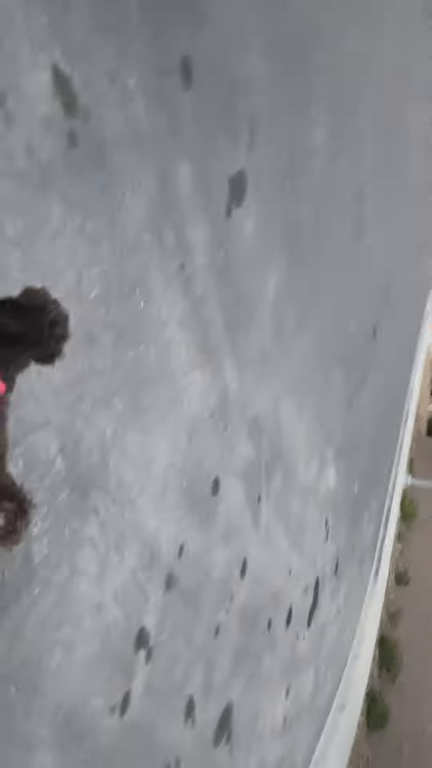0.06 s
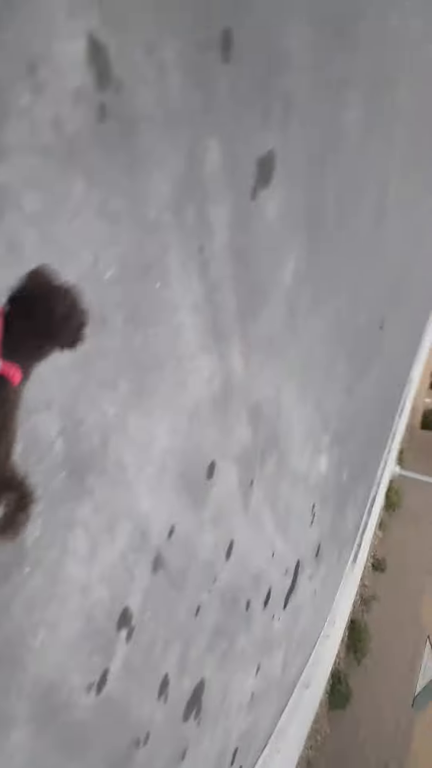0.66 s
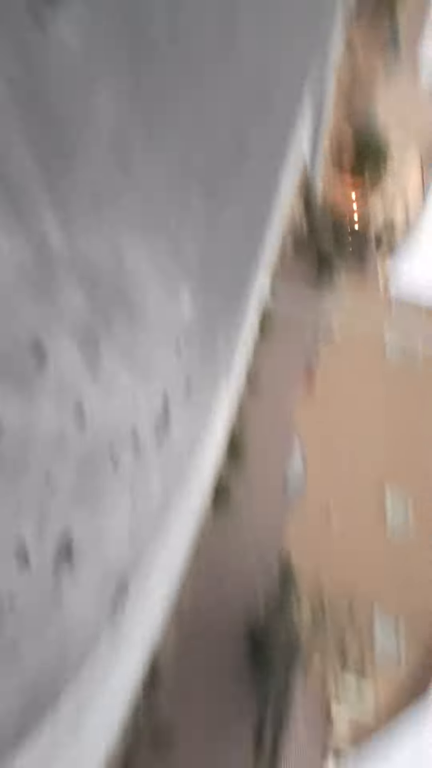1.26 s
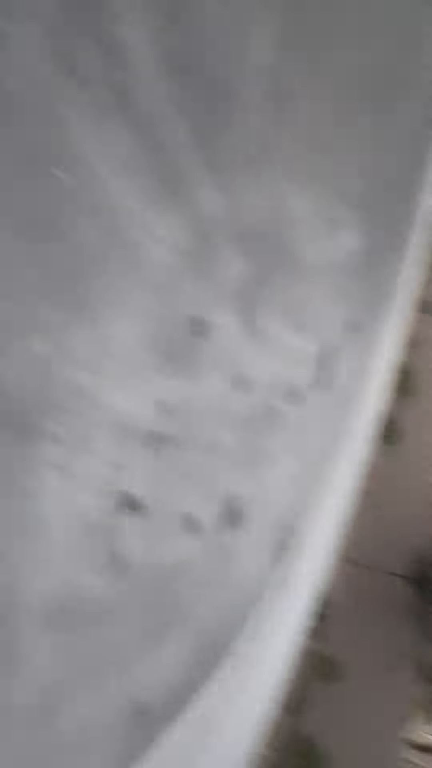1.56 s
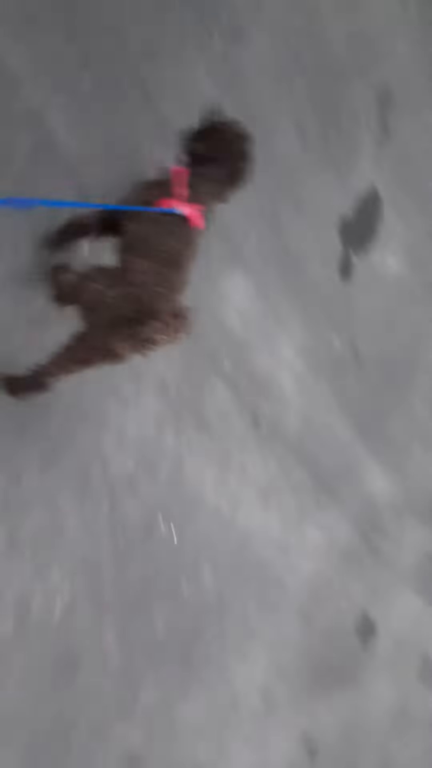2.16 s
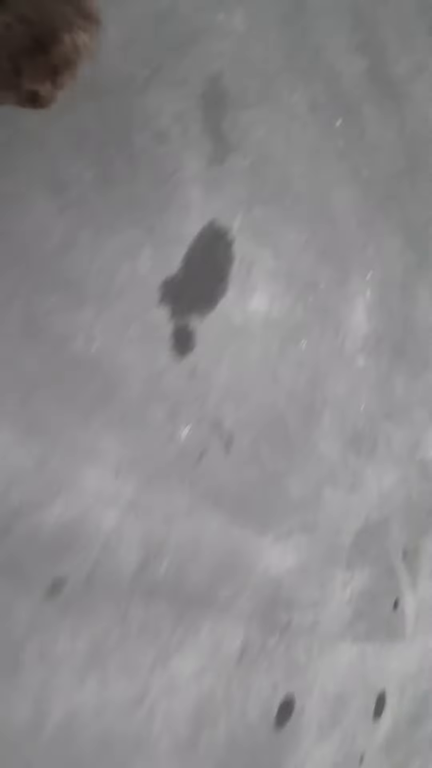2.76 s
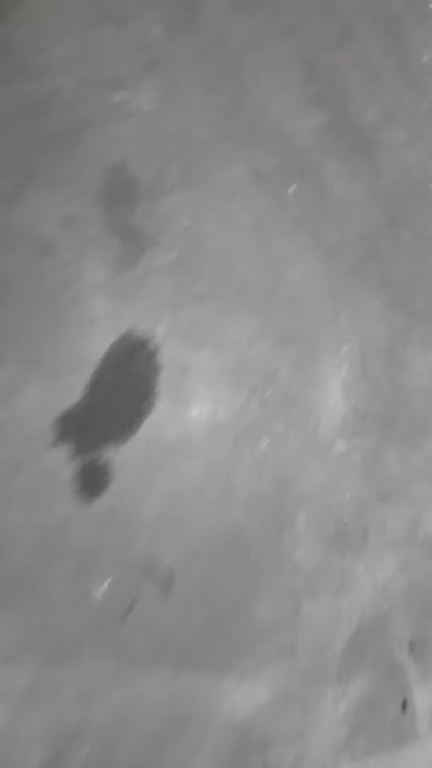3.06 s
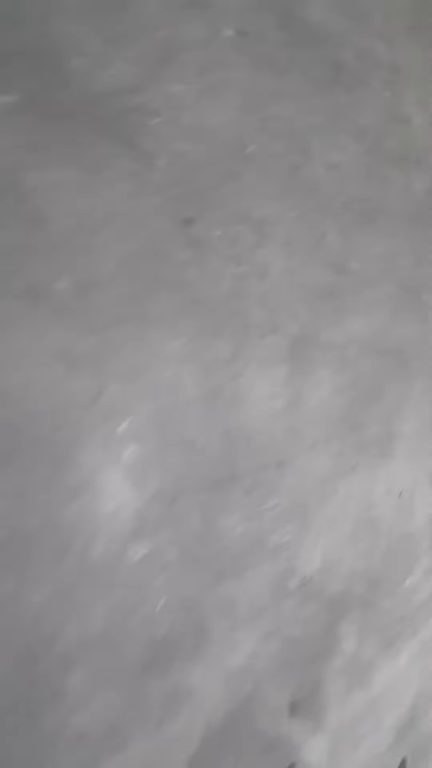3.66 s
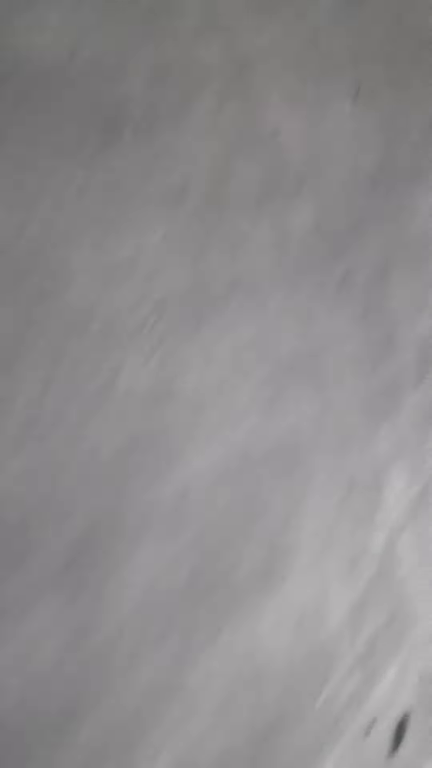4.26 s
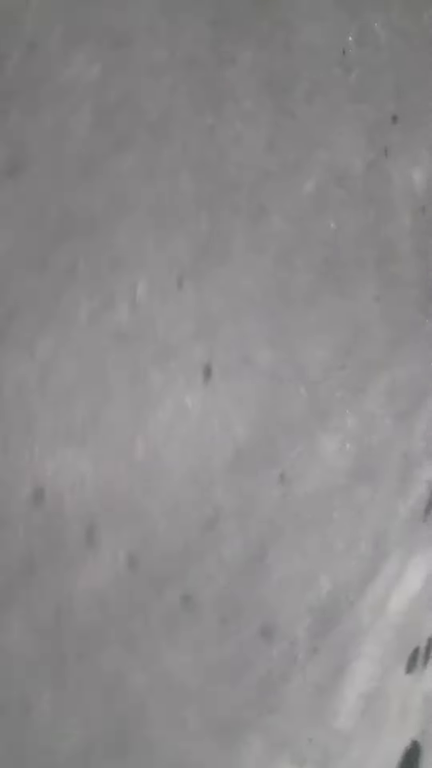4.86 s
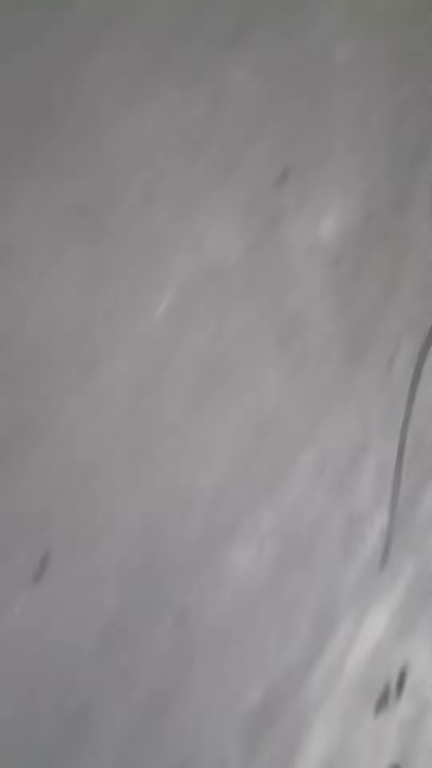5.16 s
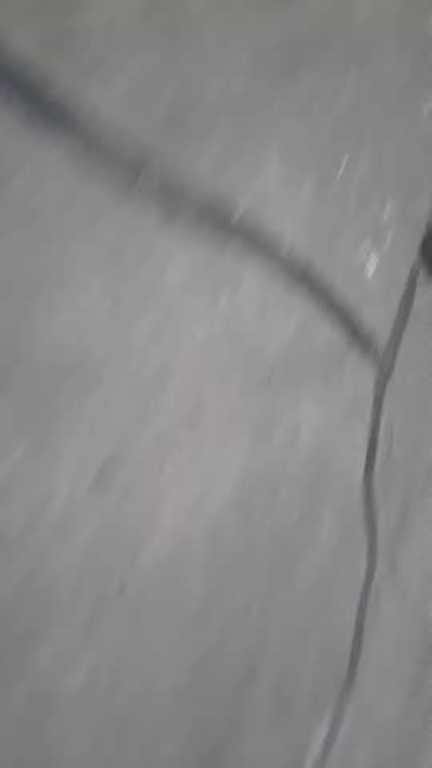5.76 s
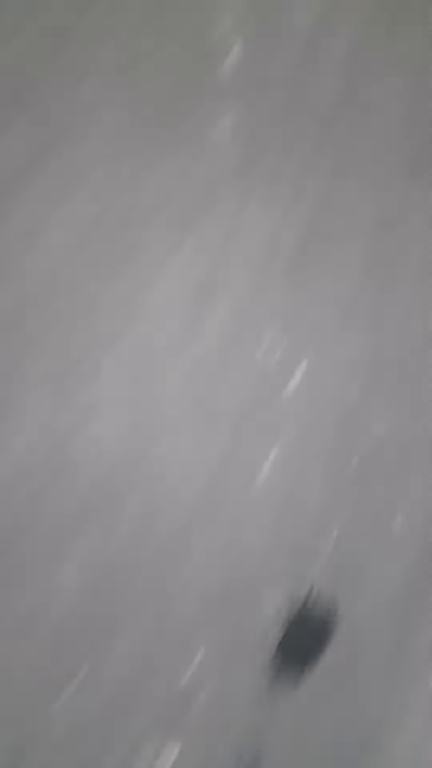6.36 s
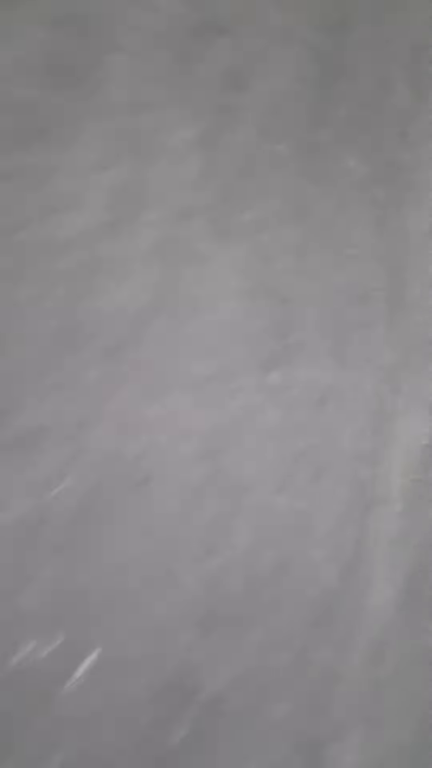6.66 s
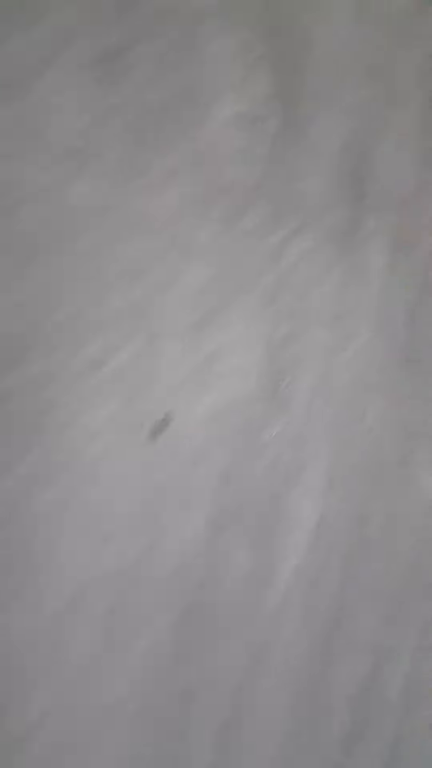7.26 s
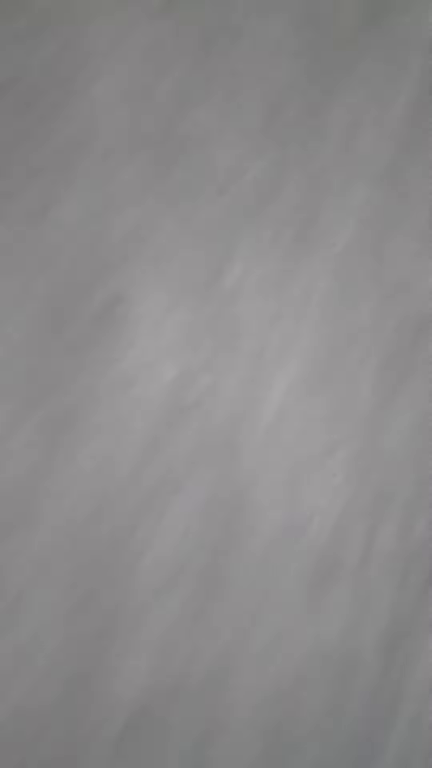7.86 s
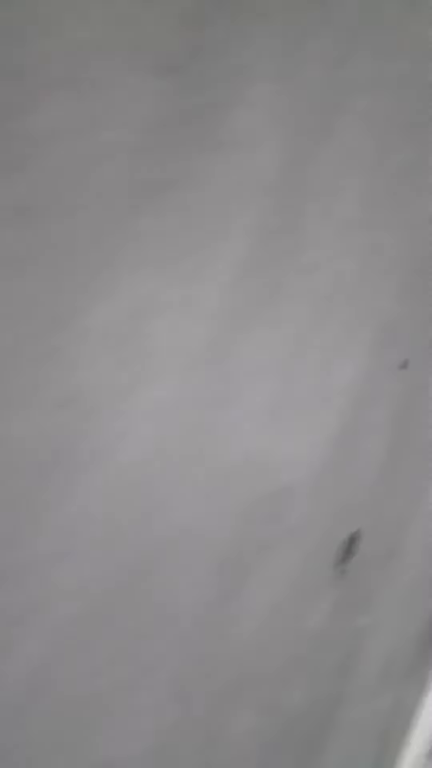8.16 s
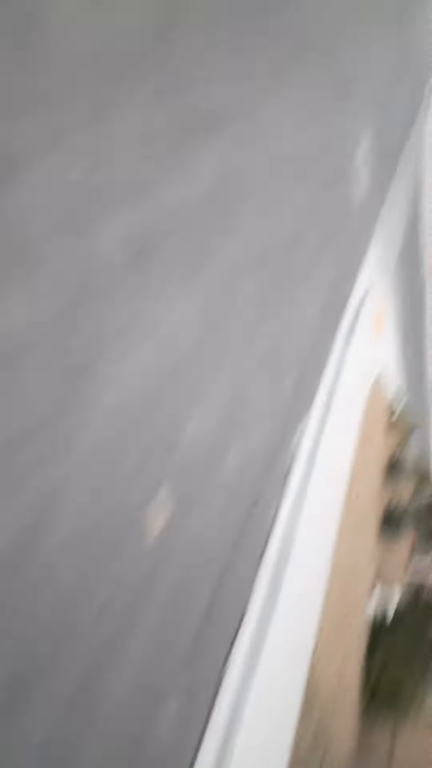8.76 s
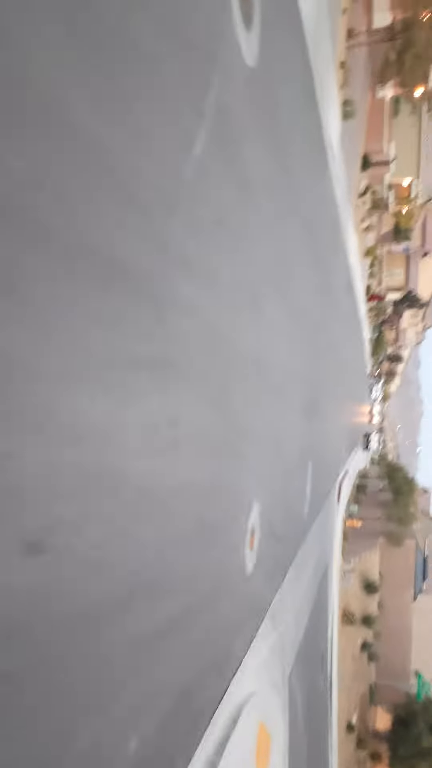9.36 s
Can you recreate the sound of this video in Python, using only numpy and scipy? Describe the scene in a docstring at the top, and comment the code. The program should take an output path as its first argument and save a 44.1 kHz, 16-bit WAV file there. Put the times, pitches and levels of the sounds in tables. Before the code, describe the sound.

Skateboard wheels rumble faster along a street while shoes scrape and knock on the wooden deck and wind buffets the microphone.

```python
"""An asphalt street: a skateboard is pushed off and gathers speed, a camera in the rider's hand.
The road's grain drums through the wheels, the bearings whirr and feet knock on the wooden deck.
Soles stick and slip on grit, something small ticks on the left, and there is a thin hiss with a
few faint squeaks. Headwind buffets the two microphone ports; the town hums far off."""
import sys
import numpy as np
from scipy import signal
from scipy.fft import rfft, irfft, next_fast_len
from scipy.io import wavfile
from scipy.ndimage import uniform_filter1d, map_coordinates

SR = 44100
rng = np.random.default_rng(int(sys.argv[2]) if len(sys.argv) > 2 else 0)


def store_pcm(level_fs):
    """Save levels as 16-bit WAV."""
    pcm = np.round(np.clip(level_fs, -1, 1) * 32767).astype(np.int16)
    wavfile.write(sys.argv[1], SR, np.atleast_2d(pcm).T)


N = 423360

# Strokes of a sole. Each row: start, crest and end in seconds, crest level in dB, slips per second
# at the crest, bite (0 dry scrape, 1 hollow rattle, 2 full rasp).
STROKES = [(1.085, 1.201, 1.22, -36, 101.7, 0.52), (1.415, 1.431, 1.464, -26, 367, .1),
           (1.46, 1.476, 1.497, -25, 370, 0.2), (1.496, 1.54, 1.57, -31, 220, 0.58),
           (1.559, 1.584, 1.68, -32.5, 496, 0), (1.741, 1.773, 1.85, -31, 293, 1.5),
           (2.087, 2.274, 2.36, -40, 58.8, 0.18), (2.38, 2.433, 2.495, -31, 92.3, 0.34),
           (2.669, 2.731, 2.87, -31, 160.5, 0.19), (2.941, 2.96, 2.985, -35, 219, 0.5),
           (3.177, 3.232, 3.275, -27, 228, 1.74), (3.261, 3.327, 3.41, -24.5, 229, 2),
           (3.374, 3.39, 3.48, -29.5, 97, 1.7), (3.486, 3.606, 3.79, -41.5, 58.9, 1.7),
           (4.31, 4.334, 4.385, -37, 120.5, 1.05), (4.381, 4.43, 4.46, -40, 160, 1.3),
           (4.565, 4.59, 4.61, -40, 140, .95), (4.908, 4.963, 5.075, -31.5, 149.7, 1.2),
           (5.404, 5.491, 5.535, -32, 143, 0.7), (5.707, 5.735, 5.8, -31, 259, 0.67),
           (5.852, 5.912, 5.95, -33.5, 91.9, 0.5), (5.978, 6.032, 6.22, -46, 85.4, 0.6),
           (6.241, 6.401, 6.55, -40.5, 117.9, 0.26), (6.585, 6.63, 6.68, -37, 89.3, .95),
           (7.132, 7.209, 7.28, -31.5, 228.6, 1.26), (7.318, 7.362, 7.44, -33, 149, 0.92),
           (8.014, 8.048, 8.21, -38, 89.2, 1.6), (8.45, 9.151, 9.44, -51.5, 300, 1.7),
           (9.44, 9.543, 9.6, -42.5, 149.4, 1.6)]
# Hard snaps of grit. Each row: time in seconds, peak in dB, pitch in Hz.
SNAPS = [(1.109, -30, 3300), (1.144, -20, 3740), (1.166, -36, 3780), (1.1877, -14.5, 3920),
         (1.303, -19, 2850), (1.52, -23, 2800), (1.535, -21, 2800), (2.0168, -24, 2830),
         (2.2847, -23, 2850), (2.345, -25, 2820), (2.674, -24, 2750), (2.708, -13, 2770),
         (2.756, -13, 2710), (2.7782, -17, 2780), (2.812, -14, 2840), (2.8415, -15, 2880),
         (2.8515, -13, 2820), (2.8625, -16, 2800), (2.882, -9.5, 2800), (2.94, -13, 2930),
         (2.9545, -14.5, 2900), (2.9675, -13, 2800), (2.9925, -13.5, 2810), (3.015, -15.5, 2820),
         (3.0425, -15.5, 2850), (3.468, -20, 2500), (3.5152, -20, 2340), (3.5344, -21.5, 2350),
         (3.5617, -11.5, 2290), (3.6188, -25, 2450), (3.765, -23.5, 2570), (3.7747, -25, 2500),
         (4.206, -17, 2520), (5.028, -19, 3080), (5.08, -20, 2860), (5.7, -14.5, 2770), (5.923, -31, 2830),
         (6.0154, -21, 2830)]
# Blows on the deck. Each row: time in seconds, peak in dB, bass weight on a log scale,
# crack in dB relative to the peak, pitch in Hz.
KNOCKS = [(0.5319, -9, -3, -9.5, 608), (0.5525, -18, -20, -22, 700), (0.5595, -22, -22, -18, 770),
          (1.08, -24, -21, -1.5, 785), (1.209, -16.5, -21, -16.5, 757), (1.393, -23, -12, -8, 660),
          (1.4505, -12.5, 5, -11, 627), (1.504, -17.5, -20, -10, 724), (1.56, -13, -15, -10, 736),
          (1.6584, -13, -22, -18, 710), (4.432, -14, -14, -24, 690), (4.588, -15, -14, -24, 695),
          (4.714, -18, -22, -19, 705), (4.9625, -10, -8, -32, 646), (4.989, -14, -20, -27, 716),
          (5.919, -23, -5, -29, 650)]
# The rattle's hardest ticks. Each row: time in seconds, peak in dB.
HARD_TICKS = [(2.5731, -24), (5.8775, -22), (6.0157, -22), (6.024, -24), (6.0501, -26), (7.0219, -25),
              (7.233, -24), (7.884, -23), (8.1289, -25), (8.4452, -22), (8.7081, -23), (8.8313, -23)]
# Weight on the wheels. Each row: middle and length in seconds, growl level in dB.
GROWLS = [(0.78, 0.069, -36), (0.92, 0.11, -36), (0.995, 0.025, -29.5), (1.524, 0.62, -31.5),
          (4.391, 0.13, -24), (4.431, 0.044, -21), (4.693, 0.29, -25.5), (4.72, 0.042, -24),
          (4.984, 0.26, -23.5), (5.94, 0.28, -24.5), (7.957, 0.23, -29.5)]
# Gusts and calms. Each row: middle and length in seconds, level change in dB.
GUSTS = [(3.0, 2, -9), (4.1, 1.3, 2), (5.517, 0.29, 10), (6.027, 0.39, 6.5), (7.22, 0.24, 3),
         (6.817, 0.5, 0.5), (8.1, 2.7, 5.5), (9.2, 1.64, -25)]

# Ringing modes. Each row: frequency in Hz, relative level in dB, t60 in seconds.
DECK_MODES = [(316, 5.5, 0.059), (514, -4.5, 0.047), (609, 12.5, 0.021), (1005, -4, 0.027),
              (1465, -8.5, 0.029), (2140, -14.5, 0.016), (2880, -6, 0.013)]
SNAP_MODES = [(2120, -6, 0.016), (2783, 3, 0.014), (3190, 3, 0.013), (3780, -0.5, 0.012),
              (4180, -13.5, 0.012), (5820, -16, 0.023)]

# Spectra. Each row: frequency in Hz, relative spectral density in dB.
SLOW_ROLL_SPECTRUM = [(41, -28.5), (70, -5), (123, 5), (189, 4), (290, 4), (388, -1), (491, 4.5),
                      (743, -2.5), (853, 1.5), (1030, -13), (1420, -17), (1900, -30), (2470, -51),
                      (4180, -120)]
FAST_ROLL_SPECTRUM = [(50, -43), (100, -15.5), (172, -1), (225, -2.5), (293, 3.5), (370, -4.5), (480, -1),
                      (620, -2), (705, 1.5), (775, -5.5), (880, -8.5), (1080, -21), (1370, -21.5),
                      (1750, -44), (4000, -56.5)]
GROWL_SPECTRUM = [(200, -15), (400, -21), (540, 2.5), (690, 8.5), (790, -3), (950, -9.5), (1400, -17.5),
                  (1900, -20), (4000, -38)]
WHIRR_SPECTRUM = [(500, -5), (1350, 6), (1900, 1), (2400, 4), (3000, 0), (3400, -4.5), (4100, -2.5),
                  (5400, -12), (6300, -12), (7500, -14.5), (12000, -36)]
DRY_SCRAPE_SPECTRUM = [(600, -8), (1000, 4.5), (1300, -2), (1700, -1), (2400, -5.5), (3100, 4.5), (4000, 4),
                       (4800, -10), (6000, -17), (7500, -17.5), (10000, -19), (16000, -22)]
HOLLOW_RATTLE_SPECTRUM = [(600, -14), (1050, -7), (1370, 3), (1650, -4), (1950, -11), (2300, 6.5),
                          (2750, 4.5), (3300, -8), (3650, -3), (4000, 1), (4500, -8), (5200, -10),
                          (6500, -16), (8100, -18), (10000, -24), (16000, -24)]
FULL_RASP_SPECTRUM = [(600, -13), (1000, -2), (1320, -1.5), (1650, -11), (1900, -1), (2200, 2.5),
                      (2700, 5.5), (3350, 2), (3800, -1), (4500, -13), (5600, -8.5), (6600, -9.5),
                      (7100, -24), (8100, -14), (10000, -21), (16000, -21)]
GRIT_CRACK_SPECTRUM = [(600, -29), (1300, -3.5), (2300, -11), (2900, -0.5), (3900, -7.5), (4700, -9),
                       (6000, -14.5), (7000, -15), (8000, -21), (16000, -21)]
WOOD_CRACK_SPECTRUM = [(600, -16), (1400, 9), (2200, 0), (2900, 2), (4000, -9), (5500, -21), (16000, -28)]
TICK_SPECTRUM = [(2000, -63), (4500, 1), (8000, 6.5), (13000, 6.5), (16000, 9.5), (17500, -9)]
HISS_SPECTRUM = [(2000, 10.5), (5500, -30), (7300, 2), (8100, 8.5), (10000, 3.5), (12000, 10), (16000, 2.5)]
TOWN_SPECTRUM = [(25, -48.5), (60, 1.5), (95, -2), (130, -1), (165, -6), (245, -8.5), (350, -20),
                 (520, -14.5), (800, -16.5), (1150, -29), (2200, -27.5), (3000, -46), (3600, -52),
                 (3900, -39), (4300, -53), (5000, -63)]
WIND_SPECTRUM = [(20, -36), (40, -7), (65, 4.5), (105, 9.5), (170, 4.5), (300, -2), (900, -76)]

# Likeness of the ports. Each row: frequency in Hz, coherence from 0 to 1.
ROLL_COHERENCE = [(100, 1), (300, 0.99), (800, 1), (1200, 0.98), (2000, 0.1)]
RUB_COHERENCE = [(1000, .85), (2000, .72), (4000, .72), (4900, .35), (6000, .42), (9000, .15)]
TOWN_COHERENCE = [(230, 0.97), (500, 0.52), (2000, 0.1)]
WHIRR_COHERENCE = [(1300, 0.33), (3000, 0.42), (6000, 0.16)]

# The left port hears more treble. Each row: frequency in Hz, left minus right in dB.
HISS_BALANCE = [(4000, -1), (6500, 3), (9000, 6.5), (14000, 7.5)]
# Where the rubbing is. Each row: time in seconds, left minus right in dB.
RUB_BALANCE = [(1.1, 0), (1.45, -1), (2.9, -0.5), (3.3, 1), (4.2, 2), (9.6, 1)]
# The camera turns in the hand. Each row: time in seconds, lead of the left port in milliseconds.
LEFT_LEAD = [(0.6, 0.15), (2.0, 0.15), (2.65, 0.07), (3.7, 0.08), (4.3, 0.15), (5.2, 0.16), (7.8, 0.17),
             (8.5, 0.1), (9.6, 0.07)]

TIME_S = np.arange(N) / SR
PUSH_S, SPEED_TAU_S = 0.53, 2.105
DECK_MAIN_HZ, SNAP_MAIN_HZ = 644, 2850  # pitches that leave the modes untransposed


def wheels():
    """The rolling board: rumble, growls and whirr."""
    rumble = ports(road_grain() + growls(), ROLL_COHERENCE) * pan(2.24)
    return turned(rumble + whirr())


def road_grain():
    """Asphalt stones drum the deck through the wheels; speed wakes other resonances."""
    fast_share = np.clip((speed(TIME_S) - 0.62) / 0.26, 0, 1)
    rate_hz = 900 + 1500 * fast_share
    contacts = np.array([grains(rate_hz, spread_db=0.5) for port in range(2)])
    stones = contacts * rng.choice([-1, 1], (2, N)) / np.sqrt(rate_hz)
    slow = np.sqrt(1 - fast_share) * unit(ring(stones, SLOW_ROLL_SPECTRUM))
    fast = np.sqrt(fast_share) * unit(ring(stones, FAST_ROLL_SPECTRUM))
    drum = load_shift(slow + fast, depth_db=1.4)
    lull = amp(-4 * swell(middle_s=4.52, length_s=0.27))  # the wheels go light
    return drum * with_speed(full_db=-19, range_db=24.5) * amp(0.7 * wobble(14)) * lull


def load_shift(pair, depth_db):
    """Deck resonances come and go independently as the load on the wheels shifts."""
    bins = signal.stft(pair, nperseg=2048)[2]
    drift = uniform_filter1d(rng.standard_normal(bins.shape[1:]), size=4, axis=0)
    drift = uniform_filter1d(drift, size=6, axis=1)
    gain = amp(depth_db * np.clip(unit(drift), -2, 2))
    return unit(signal.istft(bins * gain, nperseg=2048)[1][:, :N])


def growls():
    """Loaded wheels judder on the stones and drive the deck's midrange."""
    judder = rng.standard_normal((2, N)) * amp(3.4 * wobble(260))
    load = sum(amp(db) * swell(middle_s, length_s) for middle_s, length_s, db in GROWLS)
    return unit(ring(judder, GROWL_SPECTRUM)) * load


def whirr():
    """A brief soft hiss comes in at about half a second and fades; a whirr then grows with speed."""
    noise = ring(rng.standard_normal((2, N)) * amp(1.83 * wobble(200)), WHIRR_SPECTRUM)
    noise = unit(ports(noise, WHIRR_COHERENCE))
    brief_hiss = amp(-41.5) * set_off() * np.interp(TIME_S - PUSH_S, [0, 0.49], [1, 0])
    return noise * (with_speed(full_db=-42.5, range_db=11) + brief_hiss)


def knocks(attack_s=0.0015):
    """Feet, trucks and bumps knock the deck: damped modes, pitched by where the blow lands, and a crack."""
    track, t = np.zeros((2, N)), np.arange(SR // 8) / SR
    for at_s, peak_db, bass, crack_db, pitch_hz in KNOCKS:
        tilt = [(300, 0.87 * (bass - 8)), (600, 0), (1300, 0.82 * (crack_db + 12.5))]
        wood = np.zeros_like(t)
        for hz, mode_db, t60_s in DECK_MODES:
            decay = amp(mode_db + along(tilt, hz) + rng.normal(0, 0.94) - 60 * t / t60_s)
            wood += decay * np.sin(2 * np.pi * hz * pitch_hz / DECK_MAIN_HZ * t)
        add(track, at_s, wood * (1 - np.exp(-t / attack_s)), peak_db)
        add(track, at_s, ring(burst(t60_s=0.054), WOOD_CRACK_SPECTRUM), peak_db + crack_db)
    return track * pan(1.5)


def scuffs(edge_db=-8, db_per_rate_doubling=14, touch_s=0.0022):
    """Soles rub on grit in runs of slips, faster when harder, with single snaps among them."""
    track = np.zeros((2, N))
    spectra = [DRY_SCRAPE_SPECTRUM, HOLLOW_RATTLE_SPECTRUM, FULL_RASP_SPECTRUM]
    for start_s, crest_s, end_s, crest_db, rate_hz, bite in STROKES:
        span = np.arange(round(start_s * SR), min(round(end_s * SR), N))
        t = span / SR
        ease_db = edge_db * np.interp(t, [start_s, crest_s, end_s], [1, 0, 1])
        envelope = slips(rate_hz * 2 ** (ease_db / db_per_rate_doubling))
        crackle = envelope * rng.standard_normal((3, 2, SR))[..., :len(span)]
        shares = np.maximum(1 - abs(bite - np.arange(3)), 0)
        rub = sum(np.sqrt(shares[k]) * unit(ring(crackle[k], spectra[k])) for k in range(3))
        touch = np.clip(np.minimum(t - start_s, end_s - t) / touch_s, 0, 1)
        track[:, span] += rub * amp(crest_db + ease_db) * touch
    for at_s, peak_db, pitch_hz in SNAPS:
        add(track, at_s, snap(pitch_hz), peak_db)
    return turned(ports(track, RUB_COHERENCE)) * pan(curve(RUB_BALANCE))


def slips(rate_hz, jitter=0.35, scatter_db=3, t60_s=0.014, rub_db=-8):
    """Stick-slip envelope: uneven, fast-dying kicks over a faint steady rub."""
    gaps, sizes = np.clip(rng.standard_normal((400, 2)), -2, 2).T
    onsets = np.searchsorted(np.cumsum(rate_hz) / SR, np.cumsum(np.exp(jitter * gaps)) - 0.5)
    kicks = np.bincount(onsets, amp(scatter_db * sizes) ** 2, len(rate_hz) + 1)[:len(rate_hz)]
    power = signal.lfilter([1], [1, -amp(-60 / t60_s / SR) ** 2], kicks)
    return np.sqrt(power / (power.mean() + 1e-20) + amp(rub_db) ** 2)


def snap(pitch_hz, crack_db=4, attack_s=0.00051):
    """A piece of grit gives way: a dry crack and a short hollow ring."""
    crack = ring(burst(t60_s=0.016), GRIT_CRACK_SPECTRUM)
    t = np.arange(crack.shape[1]) / SR
    modes = np.zeros_like(crack)
    for hz, mode_db, t60_s in SNAP_MODES:
        decay = amp(mode_db + 2 * rng.standard_normal((2, 1)) - 60 * t / t60_s)
        tuned_hz = hz * pitch_hz / SNAP_MAIN_HZ * rng.normal(1, 0.01)
        modes += decay * np.sin(2 * np.pi * (tuned_hz * t + rng.random((2, 1))))
    return modes * (1 - np.exp(-t / attack_s)) + amp(crack_db) * crack / np.abs(crack).max()


def ticks(median_gap_s=0.07, full_db=-27.5, range_db=32, scatter_db=3):
    """Something small and hard rattles unevenly by the left port, harder with speed."""
    track = np.zeros((2, N))
    gaps, sizes = np.clip(rng.standard_normal((200, 2)), -2, 2).T
    times_s = PUSH_S + np.cumsum(median_gap_s * np.exp(0.81 * gaps))
    peaks_db = full_db - range_db * (1 - speed(times_s)) + scatter_db * sizes
    light_ticks = [(at_s, db) for at_s, db in zip(times_s, peaks_db) if at_s < N / SR]
    for at_s, db in list(HARD_TICKS) + light_ticks:
        add(track, at_s, ring(burst(t60_s=0.017), TICK_SPECTRUM) * pan(9.7), db)
    return track


def headwind():
    """Low lumps of air, different at each port, grow with speed and come in gusts."""
    air = unit(ring(rng.standard_normal((2, N)), WIND_SPECTRUM))
    lumps = amp(2.05 * np.array([wobble(22), wobble(9)]))
    gust_db = sum(db * swell(middle_s, length_s) for middle_s, length_s, db in GUSTS)
    return air * lumps * with_speed(full_db=-31, range_db=28.5) * amp(gust_db) * pan(-6.5)


def hiss():
    """A thin, flickering hiss swells briefly, then follows speed; stronger on the left."""
    air = unit(ring(rng.standard_normal((2, N)), HISS_SPECTRUM))
    air = filtered(air, lambda hz: pan(along(HISS_BALANCE, hz)))
    early_swell = amp(-51) * swell(middle_s=PUSH_S + 0.21, length_s=0.61)
    return air * (with_speed(full_db=-55.5, range_db=9) + early_swell) * amp(2.1 * wobble(40))


def squeaks(times_s=(4.105, 4.18, 4.27), pitch_hz=9700, width_hz=700):
    """Three faint, high squeaks of narrow-band noise."""
    band = filtered(rng.standard_normal((2, N)), lambda hz: np.exp(-((hz - pitch_hz) / width_hz) ** 2))
    return unit(band) * amp(-52.5) * sum(swell(at_s, length_s=0.035) for at_s in times_s)


def town():
    """Steady far-off hum of the streets."""
    hum = ports(ring(rng.standard_normal((2, N)), TOWN_SPECTRUM), TOWN_COHERENCE, lead_ms=0.16)
    return unit(hum) * amp(-38.5) * pan(0.71)


def speed(time_s):
    """Share of full speed, approached exponentially after the push-off."""
    return 1 - np.exp(-np.maximum(time_s - PUSH_S, 0) / SPEED_TAU_S)


def set_off(attack_s=0.083):
    """Soft rise from 0 to 1 as the board starts to move."""
    return np.interp(TIME_S - PUSH_S, [-attack_s, 0], [0, 1]) ** 3


def with_speed(full_db, range_db):
    """Gain that fades in range_db below full_db and grows with speed."""
    return set_off() * amp(full_db - range_db * (1 - speed(TIME_S)))


def ports(pair, coherence, lead_ms=0):
    """Two unrelated signals become partly coherent left and right, the left early by lead_ms."""
    angle = lambda hz: np.arccos(np.clip(along(coherence, hz), 0, 1)) / 2
    mid, side = filtered(pair, lambda hz: np.array([np.cos(angle(hz)), np.sin(angle(hz))]))
    lead = lambda hz: np.exp(np.array([[1j], [-1j]]) * np.pi * hz * lead_ms / 1000)
    return filtered(np.array([mid + side, mid - side]), lead)


def turned(pair):
    """The delay between the ports follows the camera's turn."""
    shift = curve(LEFT_LEAD) * SR / 2000  # samples per port
    return np.array([map_coordinates(x, [np.arange(N) + way * shift]) for x, way in zip(pair, (1, -1))])


def pan(balance_db):
    """Port gains for a left-minus-right level."""
    return amp(np.array([[0.5], [-0.5]]) * balance_db)


def amp(db):
    """Decibels to gain."""
    return 10 ** (np.asarray(db) / 20)


def unit(x):
    """x at rms 1."""
    return x / np.sqrt(np.mean(x ** 2) + 1e-20)


def along(points, hz):
    """(Hz, value) points read on a log axis."""
    knots_hz, values = np.transpose(points)
    return np.interp(np.log(hz + 1), np.log(knots_hz + 1), values)


def curve(points):
    """(seconds, value) points read at every sample."""
    return np.interp(TIME_S, *np.transpose(points))


def swell(middle_s, length_s):
    """Smooth rise from 0 to 1 and back."""
    return np.cos(np.pi * np.clip((TIME_S - middle_s) / length_s, -0.5, 0.5)) ** 2


def wobble(rate_hz):
    """Smooth random curve with rate_hz knots a second."""
    return map_coordinates(rng.standard_normal(int(N * rate_hz / SR) + 4), [TIME_S * rate_hz])


def grains(rate_hz, spread_db):
    """Random contacts of unequal size."""
    return (rng.random(N) < rate_hz / SR) * amp(spread_db * np.clip(rng.standard_normal(N), -2, 2))


def burst(t60_s, size=1024):
    """A dying puff of noise for each port."""
    return rng.standard_normal((2, size)) * amp(-60 * np.arange(size) / SR / t60_s)


def filtered(x, response):
    """x through a frequency response."""
    size = next_fast_len(x.shape[-1] + 8192)
    return irfft(rfft(x, size) * response(np.fft.rfftfreq(size, 1 / SR)), size)[..., :x.shape[-1]]


def ring(x, spectrum, size=4096):
    """x through a minimum-phase filter with this spectrum."""
    cepstrum = irfft(np.log(amp(along(spectrum, np.fft.rfftfreq(size, 1 / SR)))))
    cepstrum[1:size // 2] *= 2
    cepstrum[size // 2 + 1:] = 0
    impulse = irfft(np.exp(rfft(cepstrum)))
    return signal.oaconvolve(x, impulse[None], axes=1)[:, :x.shape[-1]]


def add(track, at_s, sound, peak_db):
    """Mix a sound in, scaled to peak_db."""
    part = track[:, round(at_s * SR):][:, :sound.shape[-1]]
    part += (amp(peak_db) * sound / np.abs(sound).max())[..., :part.shape[1]]


def scene():
    """All sources, summed in the open air."""
    return wheels() + hiss() + scuffs() + knocks() + ticks() + squeaks() + headwind() + town()


def record(dry):
    """The camera's band limit, 16 kHz."""
    return filtered(dry, lambda hz: hz < 16000)


dry = scene()
out = record(dry)
store_pcm(out)
```